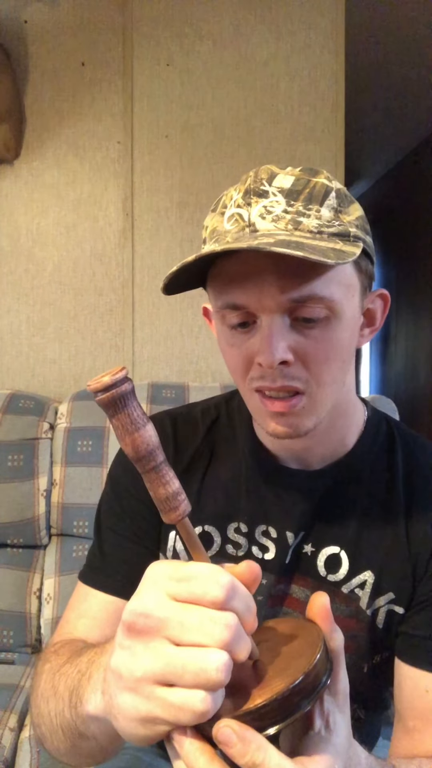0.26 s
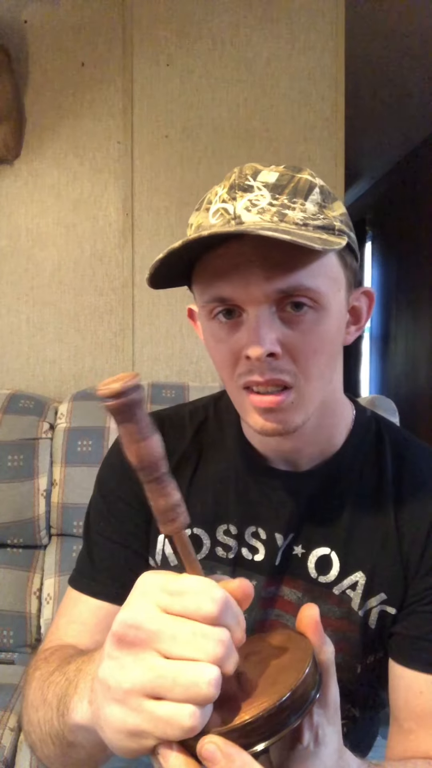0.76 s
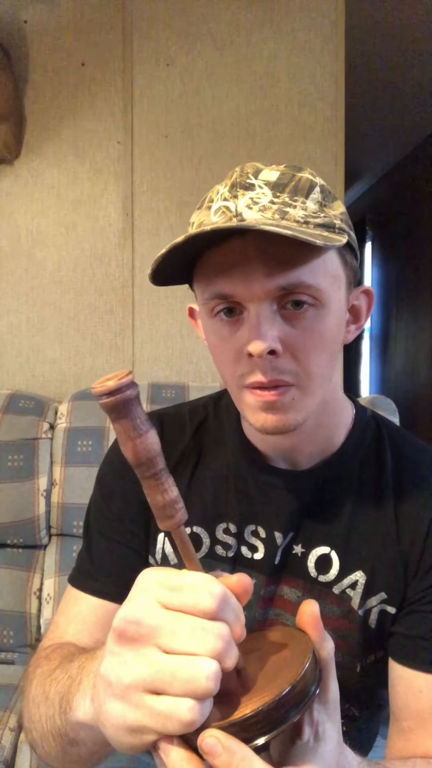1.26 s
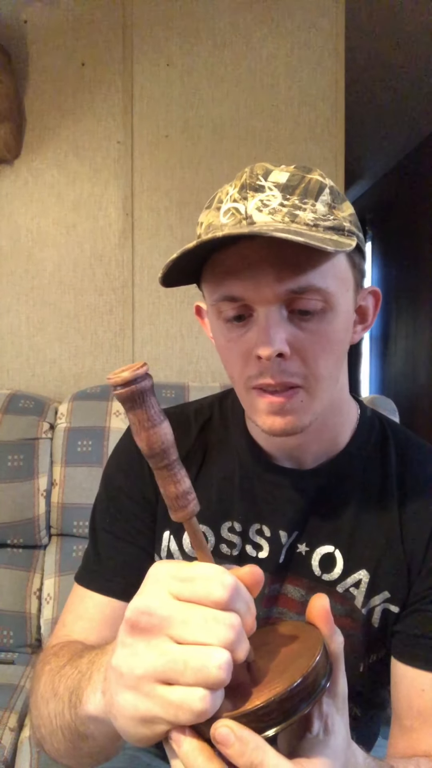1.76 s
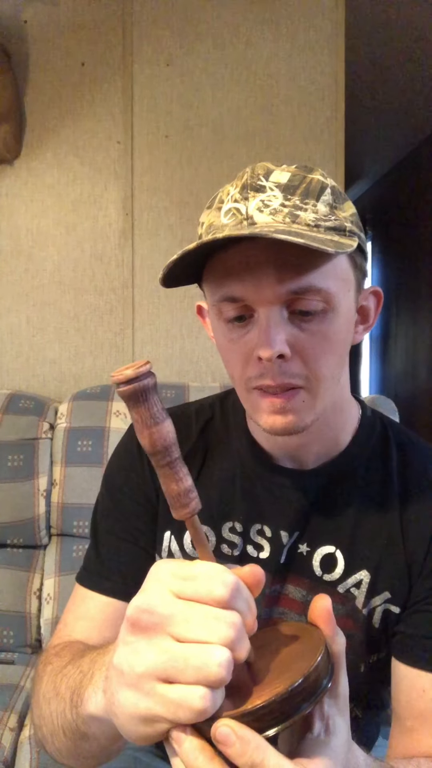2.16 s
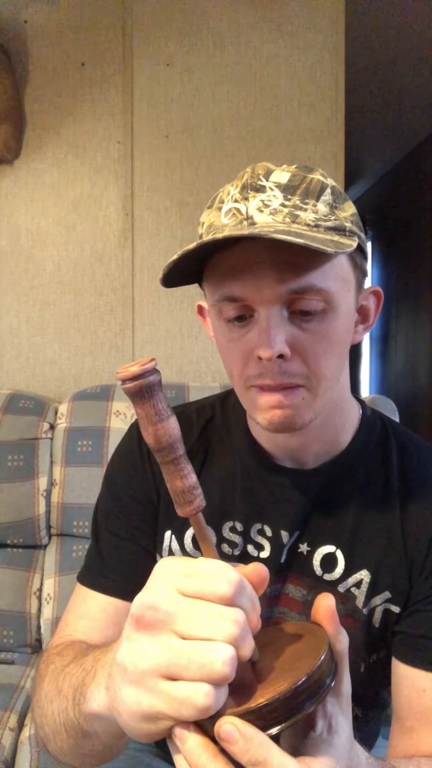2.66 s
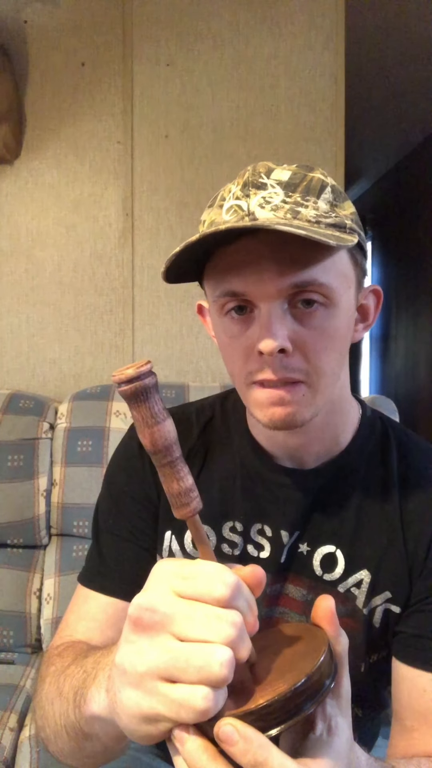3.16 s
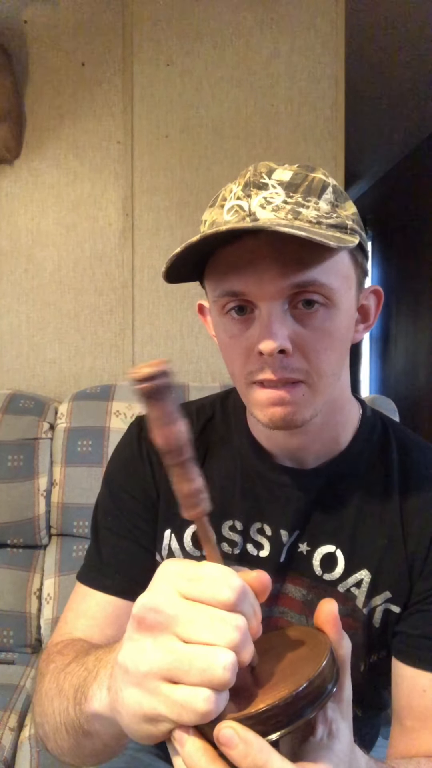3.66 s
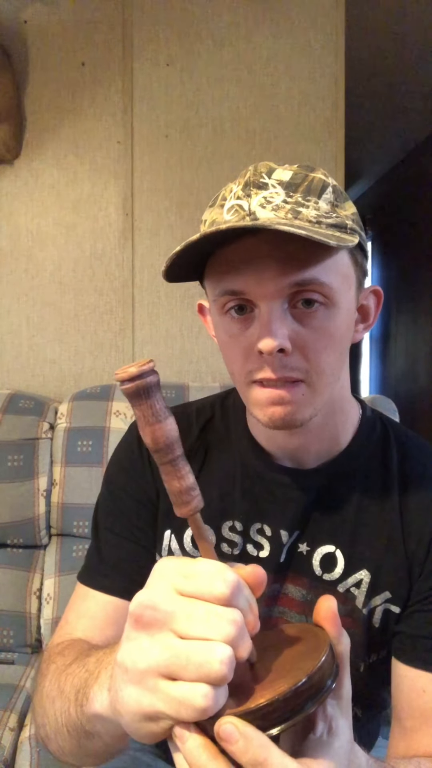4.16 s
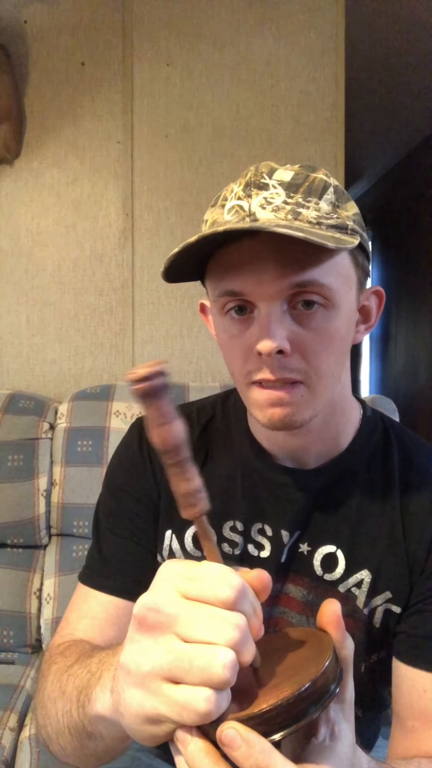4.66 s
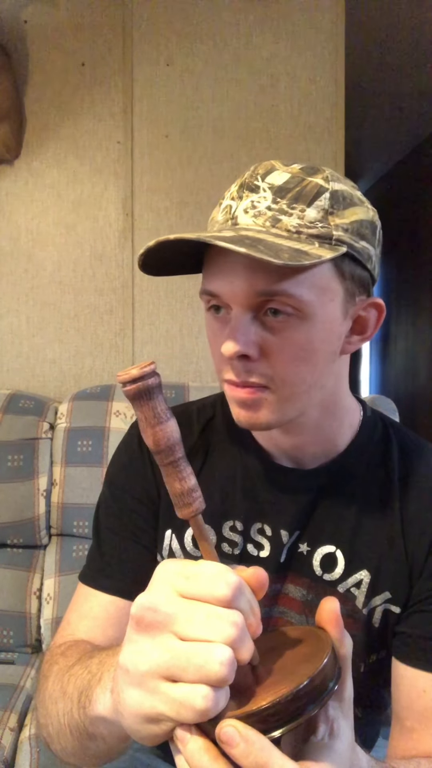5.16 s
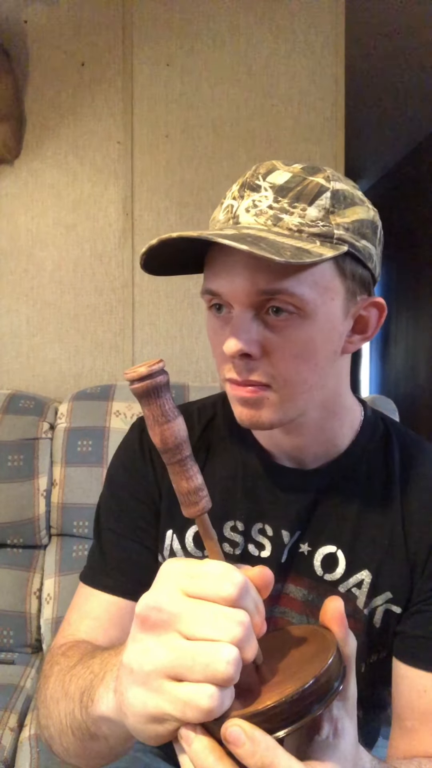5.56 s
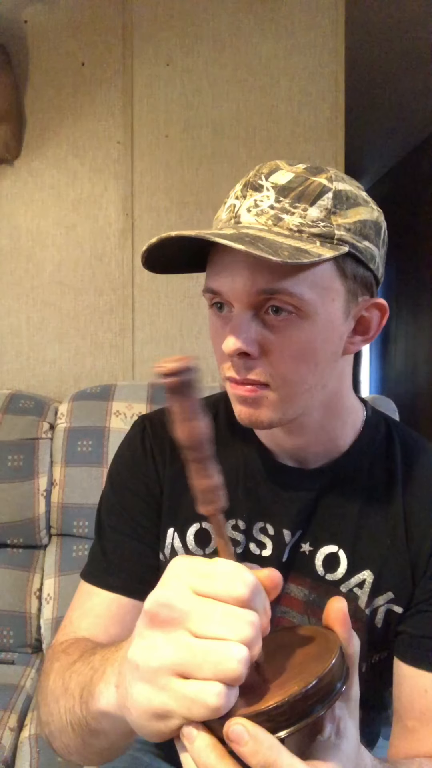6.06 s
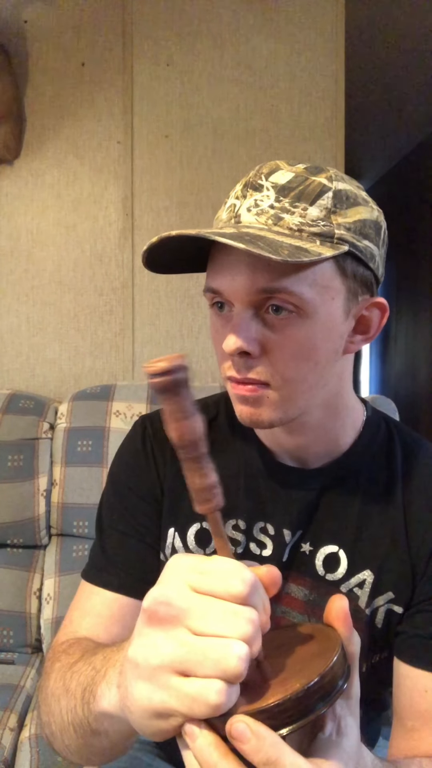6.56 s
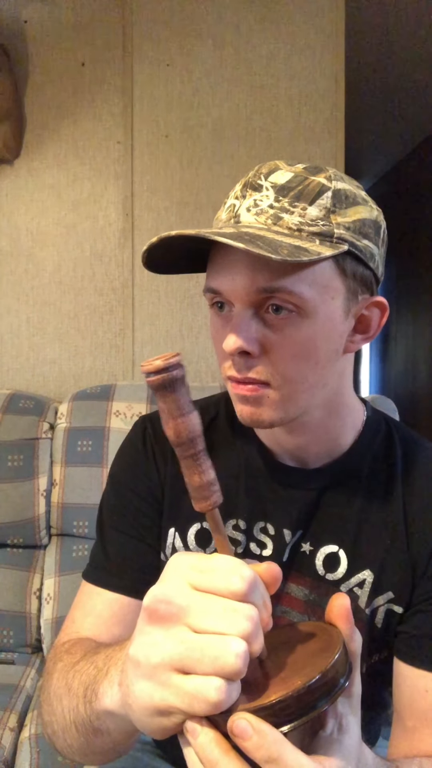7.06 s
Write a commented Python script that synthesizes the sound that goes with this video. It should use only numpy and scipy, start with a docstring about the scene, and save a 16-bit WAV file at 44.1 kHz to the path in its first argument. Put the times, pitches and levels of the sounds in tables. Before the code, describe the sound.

Close, dry friction notes in a small indoor space with short reflections. Each yelp lasts about a twentieth of a second, starting as a thin squeal and breaking into a hollow rasp that climbs at the end. Two runs of yelps are separated by a gap, a soft touch, two yelps and one clear cluck. Low room noise and mains hum continue throughout.

```python
"""Mains hum, rumble and hiss come first, then a light knock as a wooden striker touches a round pot call.
Yelps follow: each opens as a thin squeal, then friction breaks into a stick-slip cycle of twice the length,
which adds lines between the overtones; the note drops, rasps and climbs again over a dull low puff. One high
cluck, further touches and a faint rub of the fingers join them. Pot resonances filter the strokes; a small room
reflects all of these sounds."""
import sys
import numpy as np
from scipy import signal
from scipy.fft import rfft, irfft
from scipy.io import wavfile
from scipy.ndimage import uniform_filter1d, minimum_filter1d

SR = 44100
rng = np.random.default_rng(int(sys.argv[2]) if len(sys.argv) > 2 else 0)


def put_to_file(sound):
    """Save the sound as 16-bit audio at rate SR, in the file named by the first command-line argument."""
    columns = np.atleast_2d(sound).T  # one column per channel
    safe = np.clip(columns, -1, 1)
    whole_steps = np.round(safe * 32767)
    wavfile.write(sys.argv[1], SR, whole_steps.astype(np.int16))


N = 321922  # samples


def amp(db):
    """Level to amplitude: 20 dB is a factor of ten."""
    return 10 ** (np.asarray(db) / 20)


def evened(x):
    """Power normalisation: scales to rms 1."""
    return x / np.sqrt(np.mean(x ** 2) + 1e-20)


def read(points, hz):
    """Interpolates a spectrum linearly on a log-frequency axis."""
    f, value = np.transpose(points)
    return np.interp(np.log(hz + 1), np.log(f + 1), value)


def add(mix, s, sound):
    """Superposition: sums a sound into the mix from time s."""
    part = mix[round(s * SR):][:len(sound)]
    part += sound[:len(part)]


def step(t, width):
    """Smooth tanh transition from 0 to 1 around t = 0."""
    return .5 + .5 * np.tanh(t / width)


def wobble(n, hz):
    """Low-passed noise: random motion of rms 1 that weakens above hz."""
    f = np.fft.rfftfreq(n, 1 / SR)
    spectrum = rfft(rng.standard_normal(n)) / (1 + (f / hz) ** 2)
    return evened(irfft(spectrum, n))


def background():
    """Stationary noise: room rumble and hiss as shaped noise, mains hum as steady harmonics."""
    # noise spectrum: f/Hz, relative level/dB per Hz
    air_spectrum = [(20, -25.5), (45, -12), (90, -9), (180, -13.5), (300, -13), (500, -15.5), (1000, -23.5),
                    (2500, -27), (5000, -33), (8000, -34), (10000, -28.5), (12000, -32.5), (16000, -34.5)]
    # mains harmonics: f/Hz, rms level/dB
    hum_lines = [(60, -67), (120, -79), (180, -83.5), (240, -82)]
    gain = amp(read(air_spectrum, np.fft.rfftfreq(N, 1 / SR)))
    air = irfft(rfft(rng.standard_normal(N)) * gain, N)
    t = np.arange(N) / SR
    hum = sum(amp(db) * np.sqrt(2) * np.sin(2 * np.pi * (hz * t + rng.random())) for hz, db in hum_lines)
    return amp(-68) * evened(air) + hum


def pot_db(hz):
    """Radiation response: the broad curve of the pot plus resonance peaks of the plate, in dB."""
    # broad response of pot and plate: f/Hz, level/dB
    broad = [(250, -49.5), (490, -49), (590, -33), (850, -25), (1030, -32.5), (1120, -6.5), (1320, -5.5),
             (1500, -7), (1650, -7), (1950, -6), (2220, -20), (3100, -23.5), (3900, -31), (6000, -33.5),
             (7000, -44), (12700, -45), (13700, -54.5)]
    # sharp plate resonances: f/Hz, full width at half lift/Hz, lift/dB
    resonances = [(975, 130, 19.5), (1208, 79, 6.5), (2330, 230, 5), (2608, 170, 11.5), (2720, 60, 10.5),
                  (4325, 370, 9.5), (4600, 530, 13.5), (5350, 170, 9), (8450, 570, 5.5), (11900, 1500, 4),
                  (11420, 390, 6)]
    lift = sum(db / (1 + (2 * (hz - f) / width) ** 2) for f, width, db in resonances)
    return read(broad, hz) + lift


def pot(x, size=4096):
    """Minimum-phase filtering: the radiation response acts causally on a force."""
    log_gain = np.log(amp(pot_db(abs(np.fft.fftfreq(size, 1 / SR)))))
    # the Hilbert transform of the log gain gives the minimum phase
    response = np.exp(np.conj(signal.hilbert(log_gain)))
    ring = np.fft.ifft(response).real
    return signal.fftconvolve(x, ring[:size // 2])


def touch(s, peak_db):
    """Impulsive excitation: the striker lands lightly and damped modes of the pot ring."""
    # modes rung by a touch: f/Hz, relative level/dB, decay by 60 dB t60/s
    modes = [(1030, -5.5, 0.025), (1209, 5.5, 0.041), (1337, 7, 0.011), (1410, -2.5, 0.034),
             (1910, -10, .025)]
    t = np.arange(SR // 4) / SR
    ring = sum(amp(db - 60 * t / t60) * np.sin(2 * np.pi * (hz * t + rng.random())) for hz, db, t60 in modes)
    tick = pot(rng.standard_normal(len(t)) * np.exp(-t / 0.0052))[:len(t)]
    knock = evened(ring * step(t - .001, 0.00028)) + 0.14 * evened(tick)
    return s, amp(peak_db) * knock / abs(knock).max()


def shimmer(x, ring_db=-2, fade_s=0.0098, above_hz=3800, size=900):
    """Dense modal ringing: crowded upper plate modes last a few ms and favour some overtones."""
    t = np.arange(size) / SR
    ring = rng.standard_normal(size) * np.exp(-t / fade_s)
    ring /= np.linalg.norm(ring)
    ring = signal.sosfilt(signal.butter(3, above_hz, "high", fs=SR, output="sos"), ring)
    return x + amp(ring_db) * signal.fftconvolve(x, ring)[:N]


def room(x, wet_db, first_s=0.0019, build_s=0.002, size=16):
    """Reverberation: sparse reflections from near walls, with a decay that depends on frequency."""
    # decay by 60 dB: f/Hz, t60/s
    decay = [(300, 0.35), (1200, 0.4), (2500, 0.41), (5000, 0.36), (8000, .27), (13000, 0.05)]
    # reverberation spectrum: f/Hz, relative level/dB
    colour = [(300, 1), (1200, 3.5), (2500, -1.5), (5000, -7.5), (8000, 3), (13000, -9.5)]
    # one reflection of random sign at a random place in each cell of samples
    at = np.arange(0, SR // 2, size)
    taps = np.zeros(SR // 2 + size)
    taps[at + rng.integers(0, size, len(at))] = rng.choice([-1., 1.], len(at))
    hz, t, bands = signal.stft(taps, SR, nperseg=256)
    band_db = read(colour, hz)[:, None] - 60 * t / read(decay, hz)[:, None]
    tail = signal.istft(bands * amp(band_db), SR, nperseg=256)[1]
    tail *= np.clip((np.arange(len(tail)) / SR - first_s) / build_s, 0, 1)
    return x + amp(wet_db) * signal.fftconvolve(x, tail / np.linalg.norm(tail))[:N]


def tip_pitch(t, length, squeal, low_hz, end_hz):
    """Frequency glide: the squeal sags as the tip digs in, falls at the break, climbs and curls up at the lift."""
    free_hz = 1860 - 290 * step(t - .009, .0035)
    climb = np.clip((t - squeal) / (length - squeal), 0, 1.05) ** 3
    curl_hz = 70 * step(t - length + .002, .004)
    gripped_hz = low_hz + (end_hz - low_hz) * climb + curl_hz
    return gripped_hz + (free_hz - gripped_hz) * np.exp(-np.maximum(t - squeal, 0) / .0032)


def stroke(s, length, squeal, low_hz, end_hz, level_db, swell_db, treble_db, half_db, rough, size=5600, count=28):
    """Stick-slip friction: a soft rub grows into pulses, alternately strong and weak, with grit at each slip."""
    lead = .03  # s of rubbing room ahead of t = 0
    t = np.arange(size) / SR - lead
    hz = tip_pitch(t, length, squeal, low_hz, end_hz)
    broken = step(t - squeal, 0.0019)

    # the cycle is most irregular at the break and as the tip lets go
    upset = 1.84 * np.exp(-((t - squeal - .001) / 0.0053) ** 2) + step(t - length + 0.0022, 0.0031)
    chaos = rough * (0.28 + 0.073 * broken + upset)
    jitter = 1 + 0.0035 * wobble(size, 180) + 0.054 * chaos * wobble(size, 720)
    turns = np.cumsum(hz * jitter) / SR
    halves = broken * amp(half_db + 1) * (1 + .5 * chaos * wobble(size, 250))

    # the tip swings as a sine at first; sharp slips come once it grips and dull as the pressure eases
    bite = step(t - .0058, 0.001) * (1 - step(t - length + .002, 0.0079)) * amp(-3 * (t / length - .5))
    force = np.zeros(size)
    for k in range(1, count):  # odd k: lines of the doubled cycle; even k: overtones
        line_hz = k * hz / 2
        high = np.clip((line_hz - 2100) / 900, 0, 1)
        brightness = 1 - high + high * bite * amp(treble_db)
        weight = (halves if k % 2 else 1) * brightness * (line_hz < SR / 2)
        # the smooth squeal has weaker overtones than the rasp, and harder strokes slip more sharply
        hardness_db = .5 * (level_db + 15.5) * step(line_hz - 7000, 1500)
        force += weight * amp(hardness_db - 2.9 * high * (2.0 - broken)) * np.cos(np.pi * k * turns)

    grit = rng.standard_normal(size) * (1 + 0.59 * np.cos(np.pi * turns)) * bite * amp(treble_db / 2)
    grit = signal.lfilter([1, -.95], [1, -.65], grit)
    force += amp(4.5) * chaos * grit

    # the swing of the tip holds its size whichever resonance carries it
    carried = np.sqrt(amp(pot_db(hz)) ** 2 + (broken * amp(half_db + pot_db(1.5 * hz))) ** 2)
    # the squeal is strong and stumbles just before the break
    stumble_db = -5 * np.exp(-((t - squeal + 0.0016) / 0.00076) ** 2)
    rise_db = swell_db * (np.clip(t / length, 0, 1) - 1.0)
    pressure = amp(level_db + rise_db + 3.16 * (1.5 - broken) + stumble_db)
    contact = step(t - .0045, .0026) * (1 - step(t - length, .003))
    drive = force * contact * pressure * np.sqrt(2) / np.maximum(carried, amp(-7))
    # the tip already slides for a moment before it starts to sing
    rub = rough * amp(level_db - 11.5) * rng.standard_normal(size) * step(t + 0.0047, 0.014) * (1 - broken)
    return s - lead, pot(drive + rub)


def yelp(s, length, squeal, low_hz, end_hz, effort_db):
    """Friction under load: effort and a longer squeal raise the swell, brightness and rasp of a stroke."""
    usual_effort_db = -18
    # each law: value at usual effort without squeal, change per dB of effort, change per s of squeal
    # swell/dB
    swell_law = (-0.16, 0.95, 167.5)
    # treble/dB
    treble_law = (-4.5, 0.51, 209)
    # roughness/1
    roughness_law = (.31, 0.05, 13)
    swell_db, treble_db, rough = (usual + per_db * (effort_db - usual_effort_db) + per_s * squeal
                                  for usual, per_db, per_s in (swell_law, treble_law, roughness_law))
    treble_db += 0.3554 * s  # dB per s: the yelps brighten a little as the series goes on
    end_db = effort_db + swell_db / 2
    half_db = -1.37  # lines of the doubled cycle between the overtones
    return stroke(s, length, squeal, low_hz, end_hz, end_db, swell_db, treble_db, half_db, np.clip(rough, .2, 1))


def low_puff(s, length, level_db, below_db, top_hz=380, size=4400):
    """Band-passed noise: a dull low puff under a stroke, whose level grows faster than the effort."""
    t = np.arange(size) / SR
    band = signal.butter(2, [110, top_hz], "band", fs=SR, output="sos")
    noise = signal.sosfilt(band, rng.standard_normal(size))
    gain = amp(level_db + below_db + 1.6 * (level_db + 13.5))
    return s, gain * evened(noise) * np.sin(np.pi * np.minimum(t / length, 1))


def cluck():
    """Near-periodic friction: one short, high stroke with a very weak doubled cycle, and a low puff."""
    # s and length/s, squeal before the break/s, low and end pitch f/Hz, end level/dB, swell/dB,
    # treble/dB, half-pitch lines/dB, roughness/1
    settings = dict(s=3.938, length=.035, squeal=0.0077, low_hz=1577, end_hz=1736, level_db=-14.5, swell_db=-0.5, treble_db=2, half_db=-27.5, rough=0.079)
    puff = low_puff(settings["s"], settings["length"], settings["level_db"], below_db=-50.5)
    return stroke(**settings), puff


def grip(s, length, level_db, low_hz=270, top_hz=430, size=8000):
    """Sliding friction as band-passed noise: fingers rub faintly and dully on the pot's rim."""
    t = np.arange(size) / SR
    band = signal.butter(2, [low_hz, top_hz], "band", fs=SR, output="sos")
    rub = signal.sosfilt(band, rng.standard_normal(size))
    return s, amp(level_db) * evened(rub) * np.sin(np.pi * np.minimum(t / length, 1))


def scene():
    """Superposition of touches, yelps, one cluck and a shift of grip, with reflections and background."""
    # the striker touches down: t/s, peak level/dB
    touches = [(0.322, -41.5), (3.225, -43.5), (4.599, -32.5)]
    # yelps: t/s, length/s, squeal before the break/s, low pitch f/Hz, end pitch f/Hz, mid-stroke effort/dB
    yelps = [ (.389, 0.059, 0.0007, 1180, 1217, -21), (0.723, 0.044, 0.0016, 1173, 1295, -18),
             (1.067, .062, 0.0098, 1174, 1299, -17.5), (1.459, .053, .013, 1157, 1326, -17),
             (1.87, 0.048, 0.01, 1170, 1351, -16), (2.289, 0.043, .014, 1178, 1360, -16),
             (2.718, 0.052, 0.015, 1194, 1391, -15.5), (3.482, 0.034, 0.0014, 1164, 1301, -20.5),
             (3.65, 0.046, 0.014, 1272, 1456, -19), (4.484, 0.043, 0.00056, 1172, 1153, -26.5),
             (4.651, 0.054, 0.0017, 1177, 1103, -18.5), (4.922, .046, .018, 1157, 1377, -19),
             (5.224, .051, .013, 1126, 1314, -17), (5.671, 0.062, 0.0022, 1100, 1224, -20),
             (6.029, 0.054, 0.019, 1170, 1333, -17), (6.443, 0.058, 0.011, 1103, 1301, -17.5),
             (6.842, .047, 0.0046, 1090, 1351, -16.5), (7.24, 0.043, 0.011, 1165, 1367, -16)]
    # the hand shifts its grip: t/s, length/s, rms level before the fades/dB
    grip_shift = (5.905, .12, -64.5)
    call = np.zeros(N)
    for row in touches:
        add(call, *touch(*row))
    for row in yelps:
        s, length, squeal, _, _, effort_db = row
        add(call, *yelp(*row))
        # the low puff starts at the break and is stronger after a long squeal
        add(call, *low_puff(s + squeal, length - squeal, effort_db, below_db=-50.5 + 500.5 * squeal))
    for sound in cluck():
        add(call, *sound)
    add(call, *grip(*grip_shift))
    return (room(shimmer(call), wet_db=-12.5) + background())[None]


def record(dry, size=130):
    """Gain reduction and band limiting: a fast limiter holds loud peaks down, then a low-pass acts."""
    ceiling = .5
    over_db = 20 * np.log10(np.maximum(abs(dry[0]) / ceiling, 1))
    fall = np.arange(N) * 450.0 / SR  # recovery at 450 dB per s
    held_db = np.maximum.accumulate(over_db + fall) - fall
    gain_db = uniform_filter1d(minimum_filter1d(-held_db, size), size)
    limited = dry * amp(gain_db)
    low_pass = signal.firwin(511, 15950, window=("kaiser", 9), fs=SR)  # edge in Hz
    return signal.oaconvolve(limited, low_pass[None], "same")


dry = scene()
out = record(dry)
put_to_file(out)
```